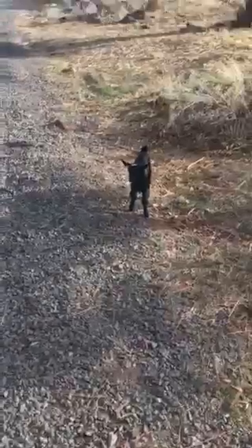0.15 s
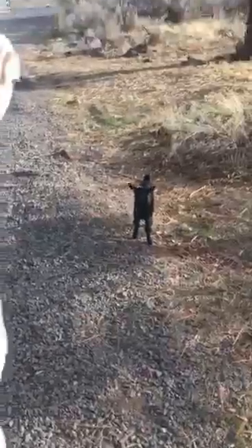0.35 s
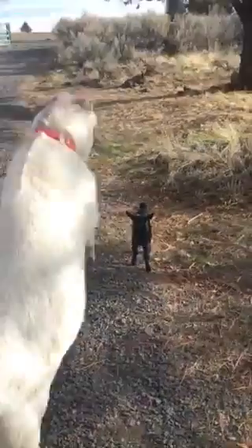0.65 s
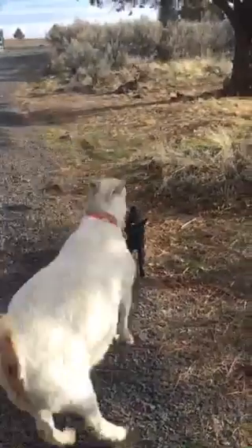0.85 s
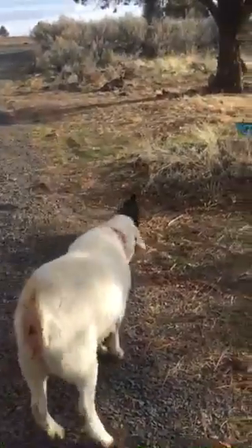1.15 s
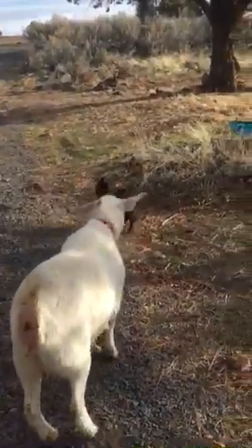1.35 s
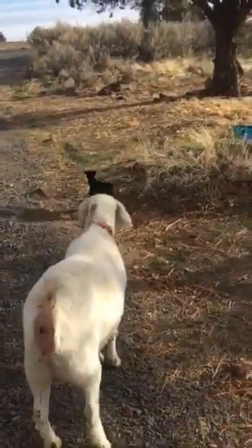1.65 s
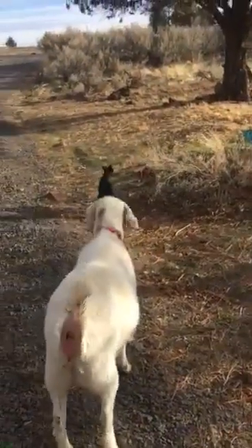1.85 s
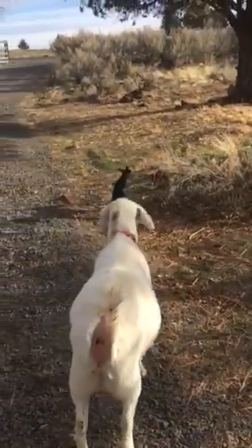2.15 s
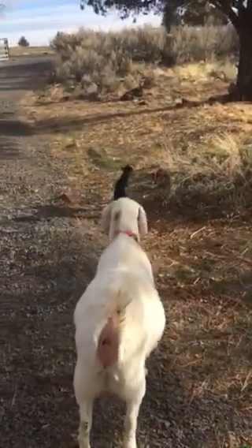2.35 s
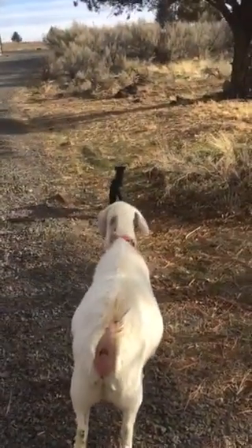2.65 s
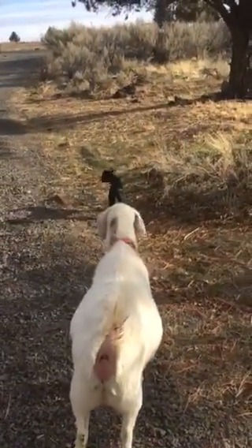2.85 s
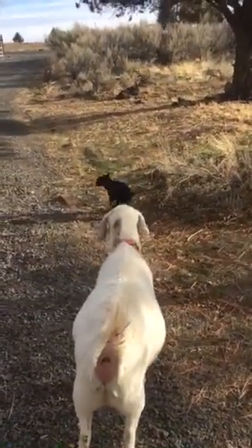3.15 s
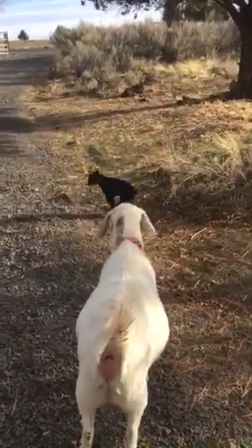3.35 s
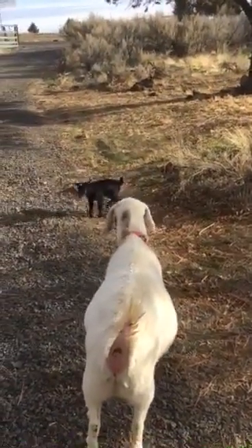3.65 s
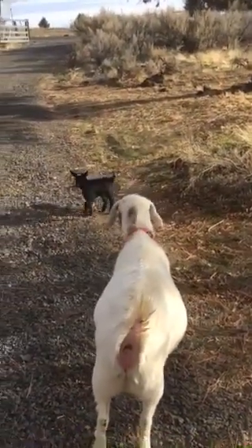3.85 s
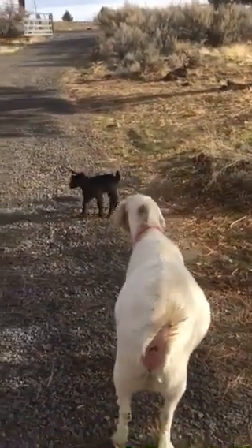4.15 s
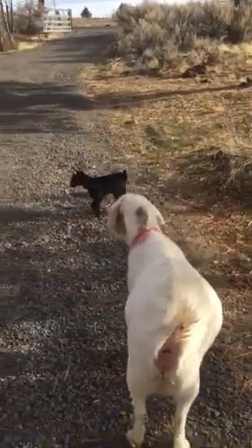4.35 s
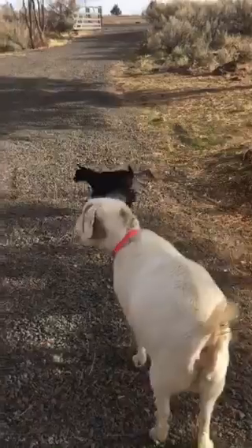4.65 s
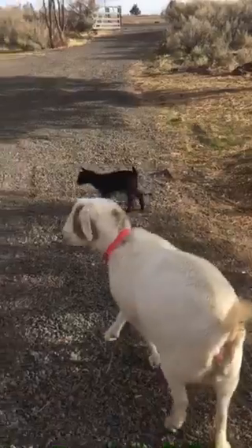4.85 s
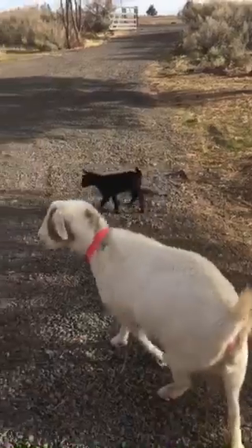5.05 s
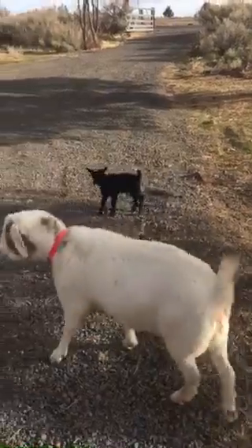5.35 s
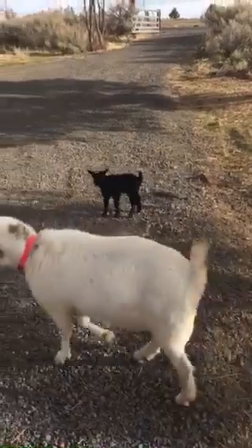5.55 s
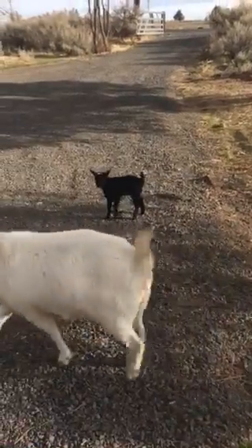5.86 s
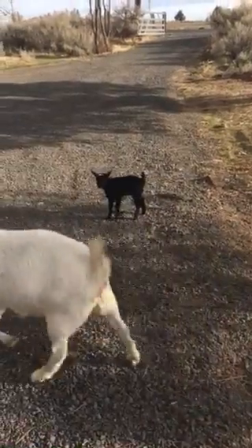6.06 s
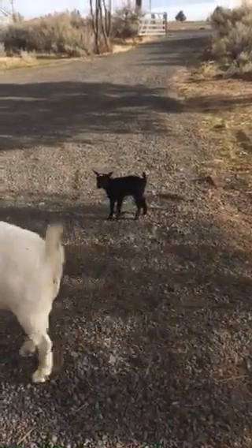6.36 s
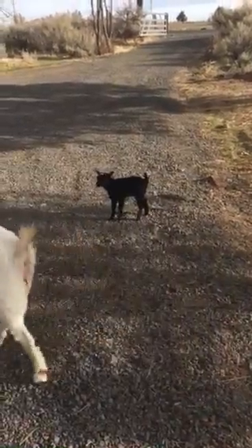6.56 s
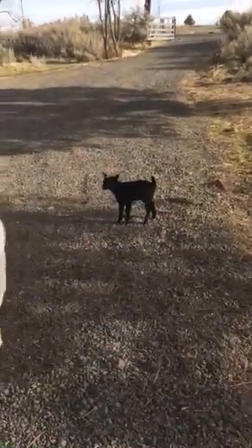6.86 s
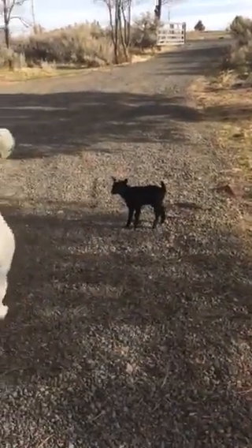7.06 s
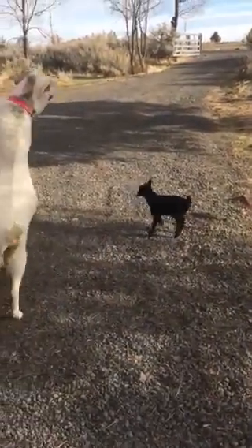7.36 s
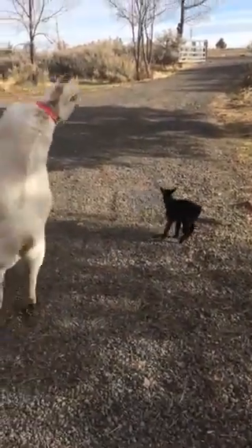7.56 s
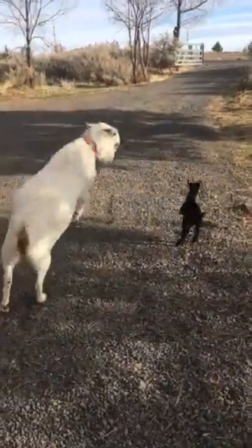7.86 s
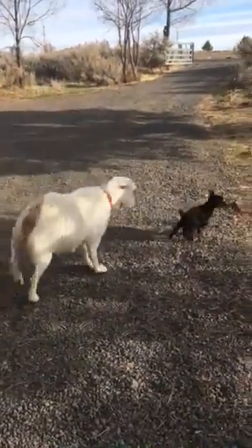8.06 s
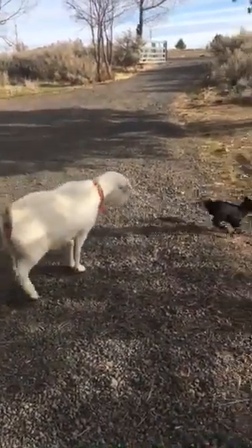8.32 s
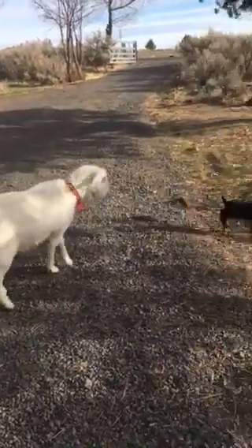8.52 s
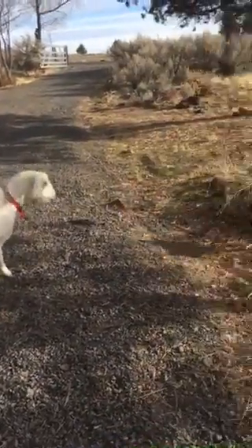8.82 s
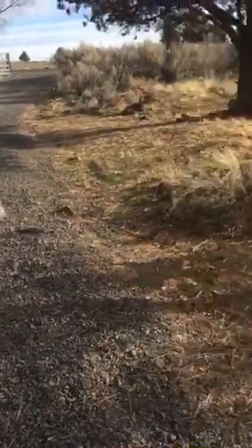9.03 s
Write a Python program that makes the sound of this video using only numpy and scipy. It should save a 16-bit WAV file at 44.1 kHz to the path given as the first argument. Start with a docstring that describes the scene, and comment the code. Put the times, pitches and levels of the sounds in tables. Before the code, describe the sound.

Still open air on a gravel drive, close and nearly dry, with a very faint far hush and light low rumbles of air on the microphone. From 0 to about 1.2 seconds boots and hooves crunch quickly and loudly, with bright stone snaps, small hollow clacks and dull thuds, strongest near 1.0. The steps thin out to a few faint grains by 2 seconds. From about 2.8 to 3.15 a goat kid gives one high, quavering squeal that cracks and turns hoarse. Near quiet follows until 4.5, when light hoof crunches resume, uneven and gritty, through 5 to 7.3. Around 7.7 and again at 8.1 sharper treads flick bright stones, with a thud at 8.1; lighter crunching continues. At 9.0 to 9.2 a grown goat bleats close by, lower, in separate strained throbs, ending the scene.

```python
"""A gravel drive in still, open air: a goat kid and a grown goat walk over it.
Boots and hooves crunch (bursts of ringing grains), flick stones (short noise snaps) and thud (damped low noise).
The kid gives one high, cracking squeal; at the end the grown goat answers close by with a pulsing bleat:
both are vocal-fold pulses and breath noise filtered by a throat. Light air rumbles on the microphone
over a faint far hush (coloured noise)."""
import sys
import numpy as np
from scipy import signal
from scipy.fft import rfft, irfft
from scipy.io import wavfile
from scipy.ndimage import uniform_filter1d

SR = 44100
rng = np.random.default_rng(int(sys.argv[2]) if len(sys.argv) > 2 else 0)


def master_out(mix):
    """Clip the mix to full scale and print it as 16-bit PCM to the path in sys.argv[1]."""
    frames = np.transpose(np.atleast_2d(mix))
    ceiling = np.clip(frames, -1, 1)
    pcm = np.round(ceiling * 32767).astype(np.int16)
    wavfile.write(sys.argv[1], SR, pcm)


N = 405279
TIME = np.arange(N) / SR
CUTOFF_HZ = 16000


def from_db(db):
    """Decibels to gain."""
    return 10 ** (np.asarray(db) / 20)


def rms_one(x):
    """Scale to unit power."""
    return x / np.sqrt(np.mean(x ** 2) + 1e-20)


def even(x, window_s):
    """Hold the running power at one."""
    power = np.abs(uniform_filter1d(x ** 2, max(int(window_s * SR), 8)))
    return x / np.sqrt(power + 1e-12)


def band(x, low_hz, high_hz, order=3):
    """Butterworth band-pass."""
    edges_hz = [low_hz, min(high_hz, .45 * SR)]
    return signal.sosfilt(signal.butter(order, edges_hz, "band", fs=SR, output="sos"), x)


def octave_band(x, hz, half_width_octaves, order=3):
    """Band-pass centred on one pitch."""
    ratio = 2 ** half_width_octaves
    return band(x, hz / ratio, hz * ratio, order)


def colour(x, points):
    """Causal (minimum-phase) filter with a given spectrum; output rms 1."""
    size = 4096
    hz, db = np.transpose(points)
    grid_hz = np.maximum(np.arange(size // 2 + 1) * SR / size, 1)
    gain = from_db(np.interp(np.log(grid_hz), np.log(hz), db))
    cepstrum = irfft(np.log(gain))
    # fold the cepstrum forward in time: minimum phase
    cepstrum[1:size // 2] *= 2
    cepstrum[size // 2 + 1:] = 0
    impulse = irfft(np.exp(rfft(cepstrum)))
    return rms_one(signal.oaconvolve(x, impulse)[:N])


def wobble(cutoff_hz):
    """Low-passed noise with rms 1."""
    lowpass = signal.butter(2, cutoff_hz, fs=SR, output="sos")
    return rms_one(signal.sosfilt(lowpass, rng.standard_normal(N)))


def swell(t, length_s):
    """Depth below the top: 0 in the middle, 1 at half a length either side, then near-linear."""
    return np.sqrt(1 + 3 * (2 * t / length_s) ** 2) - 1


def add_hit(out, start_s, peak_db, hit):
    """Add one hit, scaled to its peak level."""
    i = int(start_s * SR)
    out[i:i + len(hit)] += from_db(peak_db) * hit / np.abs(hit).max()


def grains(per_s, spread_db, cycles):
    """Random tiny contacts, each a damped resonance at the pitch of its own stone."""
    sizes = from_db(spread_db * np.minimum(rng.exponential(1, N), 4))
    sizes = sizes * rng.choice([-1, 1], N)
    clicks = sizes * (rng.random(N) < per_s / SR)
    pitches_hz = np.linspace(900, 15500, 14)
    dealt = rng.integers(0, len(pitches_hz), N)
    out = np.zeros(N)
    for k, hz in enumerate(pitches_hz):
        r = np.exp(-np.pi * (hz + 4000) / cycles / SR)   # pole radius
        poles = [1, -2 * r * np.cos(2 * np.pi * hz / SR), r * r]
        ringing = signal.lfilter([1 - r, 0, r - 1], poles, clicks * (dealt == k) + 1e-18)
        out += ringing * np.sqrt(4000 / (hz + 4000))
    return out


# puffs of air on the microphone: (middle [s], length [s], relative level [dB])
GUSTS = [(0.817, 0.042, -58), (1.02, 0.081, -41), (2.05, 0.043, -55), (2.86, 0.13, -48), (3.03, 0.014, -40),
         (3.138, .08, -46.5), (3.45, 0.32, -56), (4.06, 0.13, -52.5), (4.39, 0.046, -55),
         (4.55, .04, -54.5), (7.076, 0.071, -52.5), (7.17, 0.049, -48.5), (8.155, 0.056, -45),
         (9.18, 0.036, -47)]
# spectrum of the moving air: (frequency [Hz], relative density [dB])
BREEZE_COLOUR = [(13, -43.5), (22, -4), (43, -4), (65, 0), (120, -16), (220, -29.5), (290, -51.5),
                 (480, -120)]


def breeze(calm_db, level_db, gust_edge_db):
    """Air rumbles at the microphone: low noise with a wandering level, swelling in puffs."""
    db = calm_db + 2.1 * wobble(6)
    for middle, length, top_db in GUSTS:
        db = np.maximum(db, top_db - gust_edge_db * swell(TIME - middle, length))
    rumble = band(colour(rng.standard_normal(N), BREEZE_COLOUR), 36, 180)
    return from_db(db + level_db) * even(rumble, 0.04)


# spectrum of the distant outdoors: (frequency [Hz], relative density [dB])
HUSH = [(60, -2), (150, -6), (280, -12.5), (480, -22.5), (1000, -25.5), (2000, -30.5), (5000, -35.5),
        (16000, -41.5)]


def hush(level_db):
    """Steady far hush: noise that darkens with frequency."""
    return from_db(level_db) * colour(rng.standard_normal(N), HUSH)


# loose grit under shuffling feet: (time [s], relative level [dB])
GRIT = [(0.0, -53), (0.5, -58.5), (1.05, -60), (1.6, -71), (2.2, -77), (2.65, -84.5), (3.2, -79),
        (4.45, -79), (4.55, -57.5), (4.85, -70), (5.1, -60.5), (6.2, -63.5), (6.45, -66), (7.15, -65),
        (7.55, -75), (7.7, -56), (8.5, -58), (8.9, -70), (9.05, -62)]
# colour of the gravel, for every grain sound: (frequency [Hz], relative density [dB])
GRAVEL = [(180, -66.5), (300, 12.5), (478, 3), (634, 4), (801, -2), (1190, 0.5), (1810, -1), (2400, -1),
          (2840, -5), (3400, 0.5), (4990, -5.5), (8940, -1), (10400, -5), (15000, -3.5), (16000, -26.5)]


def grit(level_db, slide_db, slide_s):
    """Grains trickle while feet shuffle, and slide on for a moment after each tread's middle."""
    times, levels_db = np.transpose(GRIT)
    power = from_db(np.interp(TIME, times, levels_db) + level_db) ** 2
    dying = np.exp(-TIME[:SR] / slide_s)
    for start, length, tread_db, bright_db in CRUNCHES:
        i = int((start + length / 2) * SR)
        slide = from_db(tread_db + min(bright_db, 0) + slide_db) * dying[:N - i]
        power[i:i + SR] += slide ** 2
    trickle = grains(per_s=5000, spread_db=4.8, cycles=4.0)
    return np.sqrt(power) * even(colour(trickle, GRAVEL), 0.15)


# single stones snapping against each other: (time [s], peak [dB], ring [Hz])
STONES = [(0.052, -35, 8000), (0.0675, -29, 7840), (0.079, -32, 6660), (0.1982, -37, 6630),
          (0.256, -21.5, 6400), (0.271, -15, 7800), (0.293, -28.5, 3520), (0.314, -27, 4500),
          (0.3692, -23.5, 3870), (0.3762, -21.5, 6660), (0.4282, -23.5, 7200), (0.433, -21, 5800),
          (0.454, -26, 7500), (0.494, -22.5, 6600), (0.507, -20.5, 7700), (0.5977, -29, 8400),
          (0.6525, -22.5, 11500), (0.6975, -27, 7600), (0.849, -27, 7160), (0.868, -24, 9200),
          (0.9512, -41, 7000), (0.9815, -34, 8650), (1.0009, -18, 8450), (1.0365, -23, 5340),
          (1.0546, -27.5, 9900), (1.1355, -37, 8450), (1.18, -27, 8400), (1.2034, -35.5, 10300),
          (1.456, -39, 7150), (1.4935, -35.5, 8500), (1.97, -37.5, 5500), (1.9818, -41.5, 2230),
          (2.215, -44, 8000), (3.8734, -41.5, 7300), (4.0476, -43.5, 7900), (4.078, -47, 9600),
          (4.3146, -44.5, 1890), (4.5212, -34, 6300), (4.974, -37, 8700), (5.0373, -23, 8100),
          (5.1386, -24.5, 10500), (5.1448, -31, 9500), (5.349, -32.5, 7840), (5.61, -31.5, 3970),
          (5.7844, -27, 10800), (5.798, -27, 8300), (5.8056, -28, 8200), (5.814, -25.5, 8900),
          (5.922, -38, 7000), (5.9975, -29, 9900), (6.0103, -31, 5000), (6.0542, -32, 7800),
          (6.33, -37, 5130), (6.7275, -32.5, 6660), (6.89, -35, 7460), (6.9221, -31.5, 7800),
          (7.0091, -26, 3350), (7.245, -31, 3500), (7.5572, -41, 8250), (7.6824, -15.5, 9300),
          (7.729, -21, 10900), (7.826, -25.5, 7400), (7.8637, -25.5, 6700), (7.8721, -29, 9900),
          (7.8788, -21.5, 7260), (7.922, -28.5, 8450), (7.953, -30.5, 12000), (8.0005, -33, 7700),
          (8.053, -36, 6200), (8.068, -26, 10000), (8.11, -21, 9100), (8.225, -35, 6740),
          (8.3724, -32, 8170), (8.4316, -30, 8500), (8.4915, -25, 8200), (8.5154, -27, 8000),
          (8.6241, -26.5, 8700)]


def stones(rise_s, ring_s, rattle_db, rattle_s, half_width_octaves):
    """A hard snap in the stone's own register, then a short rattle of its neighbours."""
    size = 1024
    t, out = TIME[:size], np.zeros(N + size)
    decay = np.exp(-t / ring_s) + from_db(rattle_db) * np.exp(-t / rattle_s)
    contact = (1 - np.exp(-t / rise_s)) * decay
    for s, peak_db, hz in STONES:
        snap = octave_band(rng.standard_normal(size) * contact, hz, half_width_octaves, order=1)
        snap = band(snap, hz / 5, CUTOFF_HZ, order=2)
        add_hit(out, s, peak_db, snap)
    return out[:N]


# weight landing on the ground: (time [s], relative peak [dB], thud [Hz])
FOOTFALLS = [(0.07, -58, 310), (0.399, -51, 211), (0.462, -49.5, 154), (0.868, -42, 181), (1.001, -34, 233),
             (1.034, -45, 93), (1.368, -52.5, 194), (1.487, -52, 237), (5.829, -57, 83.4), (7.06, -50, 71),
             (7.124, -48.5, 174), (7.235, -58.5, 150), (7.731, -53.5, 250), (8.108, -36.5, 220),
             (8.139, -41.5, 81.5), (9.073, -50.5, 194)]


def footfalls(level_db, rise_s, decay_s, half_width_octaves):
    """The packed ground gives a dull, quickly damped thud."""
    size = 8192
    t, out = TIME[:size], np.zeros(N + size)
    envelope = (1 - np.exp(-t / rise_s)) * np.exp(-t / decay_s)
    for s, peak_db, hz in FOOTFALLS:
        ground = even(octave_band(rng.standard_normal(size), hz, half_width_octaves), 0.0089)
        thud = band(ground * envelope, 40, 326)
        add_hit(out, s, peak_db + level_db, thud)
    return out[:N]


# bigger stones knocking in their bed: (time [s], relative peak [dB], ring [Hz])
KNOCKS = [(0.078, -40, 930), (0.143, -39.5, 1570), (0.31, -33.5, 1350), (0.325, -29, 1380),
          (0.459, -44, 1710), (0.691, -37, 970), (0.721, -27, 1070), (0.742, -41, 910), (1.248, -44, 634),
          (6.822, -43.5, 1010), (7.606, -52.5, 390)]


def knocks(level_db, decay_s, half_width_octaves):
    """A bedded stone rocks and gives a short hollow clack."""
    size = 2048
    decay, out = np.exp(-TIME[:size] / decay_s), np.zeros(N + size)
    for s, peak_db, hz in KNOCKS:
        clack = octave_band(rng.standard_normal(size) * decay, hz, half_width_octaves, order=2)
        add_hit(out, s, peak_db + level_db, clack)
    return out[:N]


# a boot or hoof presses the gravel: (start [s], length [s], relative level [dB], brightness [dB])
CRUNCHES = [(0.136, 0.021, -71, 0), (0.249, 0.025, -46, 5.5), (0.314, 0.033, -49.5, 2),
            (0.367, 0.013, -46, 4), (0.404, 0.0077, -40.5, 1), (0.422, 0.037, -45.5, -1),
            (0.457, 0.03, -40.5, 2.5), (0.492, 0.055, -45, -0.5), (0.564, 0.012, -53.5, 2),
            (0.645, 0.073, -56.5, 2.5), (0.738, 0.018, -47.5, -3.5), (0.785, 0.045, -57.5, 2.5),
            (0.849, 0.053, -46.5, 1), (1.004, 0.027, -39, 1), (1.158, 0.031, -68.5, -13),
            (1.258, 0.016, -58, -0.5), (1.31, 0.083, -65.5, 5.5), (1.479, 0.028, -63.5, -7),
            (1.767, 0.0092, -48.5, -0.5), (1.818, 0.092, -72.5, 4), (1.921, 0.08, -65, -5.5),
            (2.02, 0.02, -66, -4), (2.089, 0.018, -68.5, -1), (2.49, 0.012, -74.5, -16),
            (2.549, 0.0084, -69.5, -6), (3.191, 0.023, -70, -1.5), (3.398, 0.019, -73.5, -6),
            (3.509, 0.059, -77, 2), (3.664, 0.098, -73.5, 4), (3.86, 0.047, -70, 2.5),
            (4.073, 0.031, -74, 10), (4.308, 0.14, -66.5, -1.5), (4.513, 0.064, -53.5, 4),
            (4.679, 0.092, -63, -1.5), (4.863, 0.031, -62.5, 4.5), (4.967, 0.04, -58, 1),
            (5.018, 0.067, -51, 2.5), (5.169, 0.065, -54, 2), (5.408, 0.032, -58, -2),
            (5.453, 0.099, -59, 0), (5.603, 0.012, -64, -6), (5.726, 0.028, -51, 2.5),
            (5.795, 0.055, -50, 0.5), (5.911, 0.014, -53.5, 1.5), (5.924, 0.18, -60.5, -1),
            (6.126, 0.064, -46.5, -1), (6.26, 0.099, -62.5, 4), (6.474, 0.0065, -56, -2),
            (6.534, 0.014, -49.5, 1.5), (6.608, 0.049, -58.5, 2), (6.665, 0.096, -57, -1.5),
            (6.801, 0.019, -58, 0), (6.892, 0.028, -59, -1), (6.955, 0.03, -55.5, 0),
            (7.071, 0.076, -50.5, -0.5), (7.237, 0.015, -45, -6), (7.274, 0.045, -67.5, -8),
            (7.466, 0.04, -62.5, -2.5), (7.558, 0.0079, -59, 6), (7.637, 0.025, -55.5, -5),
            (7.664, 0.037, -44, 1.5), (7.726, 0.029, -43, 4.5), (7.794, 0.033, -67.5, 15.5),
            (7.865, 0.018, -51.5, 8), (8.098, 0.057, -45.5, 0.5), (8.164, 0.044, -47, 1),
            (8.281, 0.076, -60.5, 3.5), (8.357, 0.087, -58, 8.5), (8.46, 0.092, -56.5, 5.5),
            (8.647, 0.015, -58.5, 10), (8.678, 0.008, -48.5, 5.5), (8.748, 0.024, -57.5, 1.5),
            (8.899, 0.075, -69, -3.5), (9.027, 0.048, -55.5, -1), (9.129, 0.005, -59, 1),
            (9.152, 0.0073, -49, -3.5)]
# low, middle and high part of a crunch: (low edge [Hz], high edge [Hz])
GRAVEL_BANDS = [(500, 2000), (2000, 6000), (6000, 16000)]


def crunches(rise_s, fall_s, arch_db, crest_skew, low_db, middle_db, high_db):
    """Each tread presses a burst of grains out of the gravel; brightness tilts it from low band to high."""
    gravel = colour(grains(per_s=5000, spread_db=1.0, cycles=5.9), GRAVEL)
    pressure = np.zeros((len(GRAVEL_BANDS), N))
    for start, length, db, bright_db in CRUNCHES:
        near = slice(max(int((start - .03) * SR), 0), int((start + length + .15) * SR))
        t = TIME[near] - start
        shape = np.exp(np.minimum(t, 0) / rise_s - np.maximum(t - length, 0) / fall_s)
        crest = np.sin(np.pi * np.clip(t / length, 0, 1) ** crest_skew)
        arch = from_db(arch_db * (crest - 1))
        levels = from_db([db + low_db - bright_db, db + middle_db, db + high_db + bright_db])
        pressure[:, near] = np.maximum(pressure[:, near], levels[:, None] * shape * arch)
    return sum(p * even(band(gravel, *edges), 0.021) for p, edges in zip(pressure, GRAVEL_BANDS))


def pebbles(gravel, per_s, spread_db, level_db, follow_s):
    """Sparser pebbles slip at random, as hard as the gravel around them is being pressed."""
    pressed = np.sqrt(np.abs(uniform_filter1d(gravel ** 2, int(follow_s * SR))))
    return from_db(level_db) * pressed * colour(grains(per_s, spread_db, cycles=3.7), GRAVEL)


def quaver(throbs, strain, edge_shape):
    """Voice controls: the loudest throb leads; pitch and hoarseness are least in its middle."""
    swing_per_s = 11.5   # pitch swings fully in half a period either side of the middle
    edge_db = 7.5        # lost half a length from the middle
    middle, length, hz, fall, rise, db, shrill, mouth, hoarse = np.transpose(throbs)
    depth = swell(TIME - middle[:, None], length[:, None]) ** edge_shape
    levels = db[:, None] - edge_db * depth
    k = levels.argmax(axis=0)
    t = TIME - middle[k]
    tight = np.sin(np.pi * np.clip(t * swing_per_s, -.5, .5)) ** 2
    pitch = hz[k] * 2 ** (np.where(t < 0, fall[k], rise[k]) * tight)
    level = np.maximum(levels.max(axis=0), -160)
    controls = [pitch, level, shrill[k], mouth[k], hoarse[k] + strain * tight ** 2]
    return uniform_filter1d(np.array(controls), int(.004 * SR), axis=1)


def bleat(throbs, shut, wide, edge_shape, strain, jitter, deep_db, shrill_db):
    """Vocal-fold pulses through the throat; when hoarse they jitter, alternate strong and weak, and rasp."""
    pitch, db, shrill, *shares = quaver(throbs, strain, edge_shape)
    mouth, hoarse = np.clip(shares, 0, 1)
    on, pulses = db > -90, np.zeros(N)
    unsteady_pitch = pitch * (1 + jitter * (hoarse + 0.0513) * wobble(415))
    phase = 2 * np.pi * np.cumsum(unsteady_pitch) / SR
    for k in range(1, 28):
        pulses[on] += np.cos(k * phase[on]) * (k * pitch[on] < CUTOFF_HZ)
    pulses = even(pulses, 0.0041) * (1 + hoarse * np.cos(phase / 2))
    air = (hoarse + 0.046) * rng.standard_normal(N) * (1 + 1.2 * np.cos(phase))
    folds = on * (pulses + air)
    voice = (1 - mouth) * colour(folds, shut) + mouth * colour(folds, wide)
    low = from_db(deep_db) * even(band(voice, 350, 3300), 0.014)
    high = from_db(shrill + shrill_db) * even(band(voice, 3300, 15000), .012)
    return on * from_db(db) * (low + high)


# throbs of the squeal: (middle [s], length [s], pitch [Hz], fall into it [octaves], rise out of it [octaves],
# relative level [dB], relative shrillness [dB], mouth opening [0-1], base hoarseness [0-1])
KID_THROBS = [(2.778, 0.0098, 1223, 0, 1.6, -63.5, -15, .05, .15),
              (2.819, 0.046, 1240, .55, 0.43, -56.5, -11, .05, 0.07),
              (2.873, .042, 1290, .4, .45, -60.5, -5, .05, .2),
              (2.912, 0.018, 1268, 0.98, 0.2, -52.5, -1, .7, 0.15),
              (2.923, 0.052, 1676, 0.19, 0.029, -59, 8.5, .95, 0.8),
              (2.984, .046, 1074, .5, 0.46, -58, 8.5, 1, .08),
              (3.0, 0.035, 1492, 0.41, .5, -55.5, 3, .95, 0.76),
              (3.068, .04, 1150, 0.48, 0.53, -65, 8.5, 0.7, 0.18),
              (3.092, 0.028, 1333, 0.38, 1.6, -65, 3, 0.53, 0.17),
              (3.131, 0.021, 1787, 0.16, .2, -59.5, 3.5, .2, 1)]
# kid's throat, mouth nearly shut and wide open: (frequency [Hz], relative level [dB])
KID_SHUT = [(800, -28), (1200, 0), (1700, -4), (2100, -7), (2700, -2.5), (3300, -14), (4100, -6),
            (5200, -8), (6600, -6), (8000, -13), (9200, -11), (10300, -22), (12000, -19), (14000, -30)]
KID_OPEN = [(800, -37), (1200, -1), (1700, 10), (2200, 0), (2800, -3), (3300, -16), (4100, -2), (5000, -8),
            (5900, 7.5), (6800, -5), (8000, -9), (10000, -28), (11500, -18), (14000, -38)]


def kid_squeal():
    """Small, high throat: the pitch quavers and cracks."""
    return bleat(KID_THROBS, KID_SHUT, KID_OPEN, edge_shape=0.82, strain=.25, jitter=0.085,
                 deep_db=-1.5, shrill_db=-0.9)


# throbs of the bleat: (middle [s], length [s], pitch [Hz], fall into it [octaves], rise out of it [octaves],
# relative level [dB], relative shrillness [dB], mouth opening [0-1], base hoarseness [0-1])
DOE_THROBS = [(9.003, 0.037, 508.6, 0.42, 0.32, -49.5, 6.5, .1, 0.074),
              (9.026, .02, 594, 0.38, 0.19, -55, 11, .2, 0.51),
              (9.073, 0.017, 735, 0.202, 0, -50.5, 5, 0.61, .7),
              (9.095, .034, 672, .22, 0, -40, 3.6, 0.99, .05),
              (9.183, 0.027, 647, .36, .3, -41.5, 3.6, .95, 0.044)]
# grown goat's throat, mouth nearly shut and wide open: (frequency [Hz], relative level [dB])
DOE_SHUT = [(400, -13), (1050, -5.5), (1650, -11), (2100, -13), (2580, -6), (3000, -16), (4500, -13.5),
            (5750, 0.5), (6400, -5), (7300, -3), (7900, -9), (8900, 1), (10000, -15), (15000, -14)]
DOE_OPEN = [(400, -26), (670, -6), (1350, -11.5), (2020, -5), (2700, -12), (3400, -13), (4050, -13),
            (4720, -2.5), (6750, -4.5), (7400, -25), (8100, -10), (8800, -10), (10000, -21), (15000, -26)]


def doe_bleat():
    """Larger, lower throat: separate throbs that strain into hoarseness at their edges."""
    return bleat(DOE_THROBS, DOE_SHUT, DOE_OPEN, edge_shape=1.6, strain=2.0, jitter=0.032,
                 deep_db=-1.5, shrill_db=0.0)


def outdoors(x, scatter_db, decay_s):
    """Ground, brush and trees scatter back a faint short tail."""
    t = TIME[:SR // 2]
    tail = rng.standard_normal(len(t)) * np.exp(-t / decay_s) * (t > .004)
    scattered = signal.oaconvolve(x, tail / np.linalg.norm(tail))[:N]
    return x + from_db(scatter_db) * band(scattered, 200, 7700)


def scene():
    """Steps on gravel and the two goats in the open."""
    air = breeze(calm_db=-66.5, level_db=-2.0, gust_edge_db=6) + hush(level_db=-65)
    trickle = grit(level_db=-2.5, slide_db=-18, slide_s=0.074)
    snaps = stones(rise_s=0.000081, ring_s=0.00075, rattle_db=-22, rattle_s=0.0039, half_width_octaves=0.54)
    thuds = footfalls(level_db=2.5, rise_s=0.0016, decay_s=0.014, half_width_octaves=0.83)
    clacks = knocks(level_db=-4.0, decay_s=0.0033, half_width_octaves=0.46)
    treads = crunches(rise_s=0.0011, fall_s=0.0072, arch_db=8, crest_skew=0.54,
                      low_db=-6.0, middle_db=-0.5, high_db=1.0)
    # gravel gives way in small clumps
    gravel = (treads + trickle) * from_db(2.2 * wobble(90))
    pressed_pebbles = pebbles(gravel, per_s=110, spread_db=3.0, level_db=-9, follow_s=0.023)
    loose_pebbles = pebbles(trickle, per_s=22, spread_db=2.2, level_db=-2.5, follow_s=0.14)
    steps = gravel + pressed_pebbles + loose_pebbles + snaps + thuds + clacks
    sources = outdoors(steps, scatter_db=-15.5, decay_s=0.032)
    sources = sources + outdoors(kid_squeal(), scatter_db=-19, decay_s=0.018)
    sources = sources + outdoors(doe_bleat(), scatter_db=-24, decay_s=0.032)
    return (sources + air)[None]


def record(dry):
    """The top is cut steeply."""
    return signal.sosfilt(signal.ellip(10, .2, 70, CUTOFF_HZ, fs=SR, output="sos"), dry)


dry = scene()
out = record(dry)
master_out(out)
```